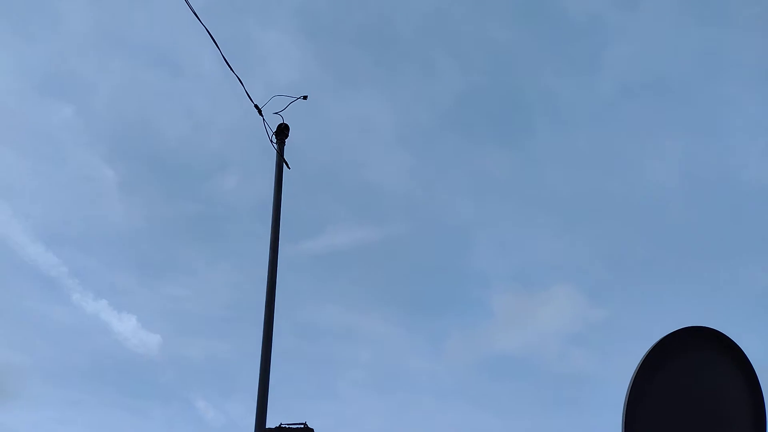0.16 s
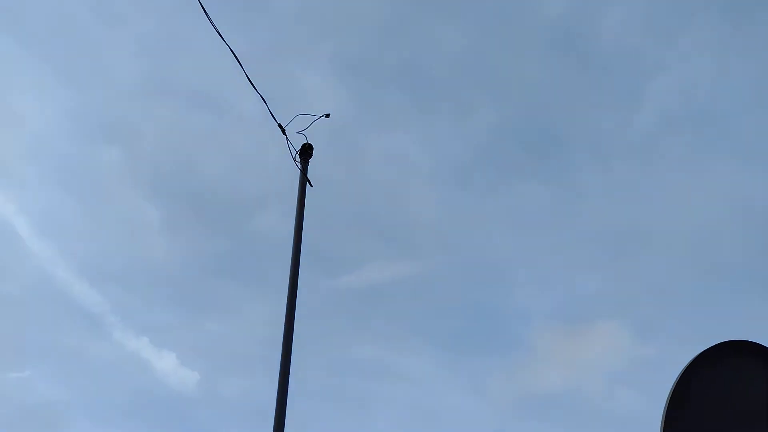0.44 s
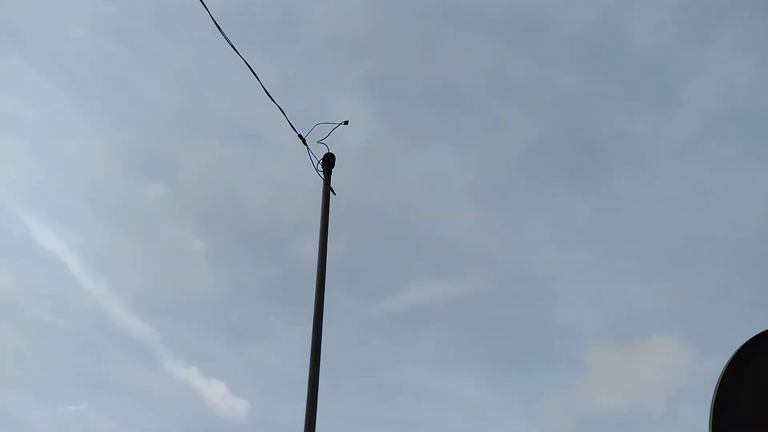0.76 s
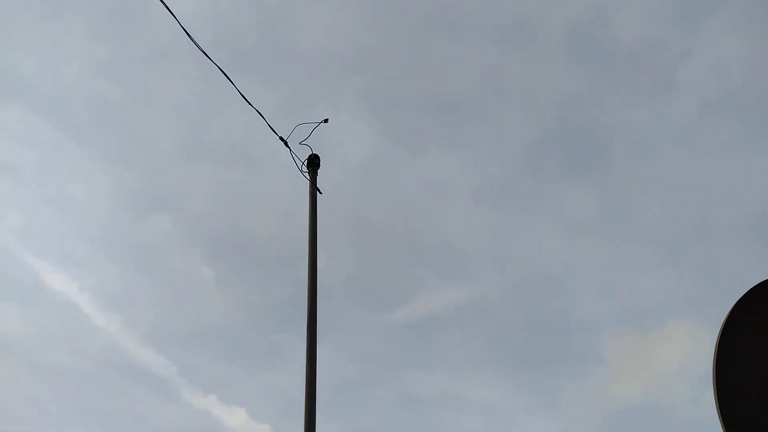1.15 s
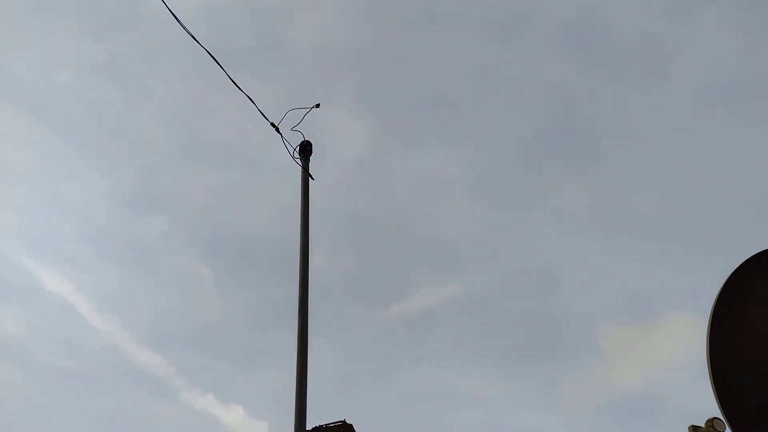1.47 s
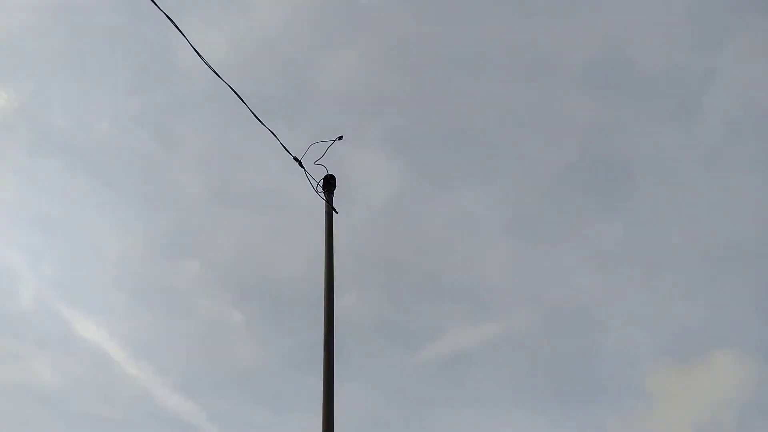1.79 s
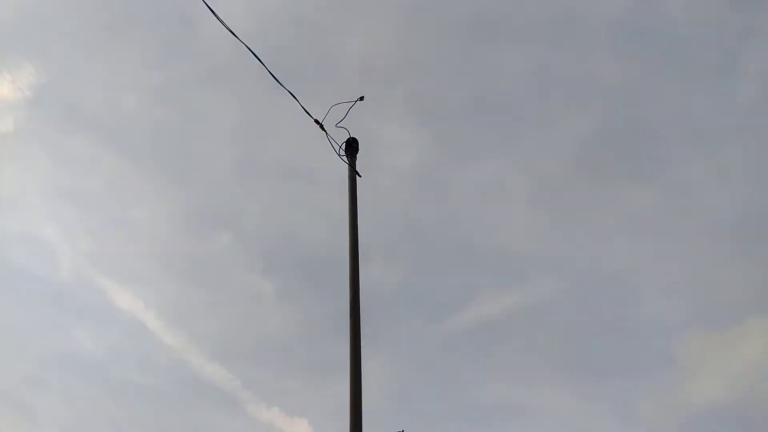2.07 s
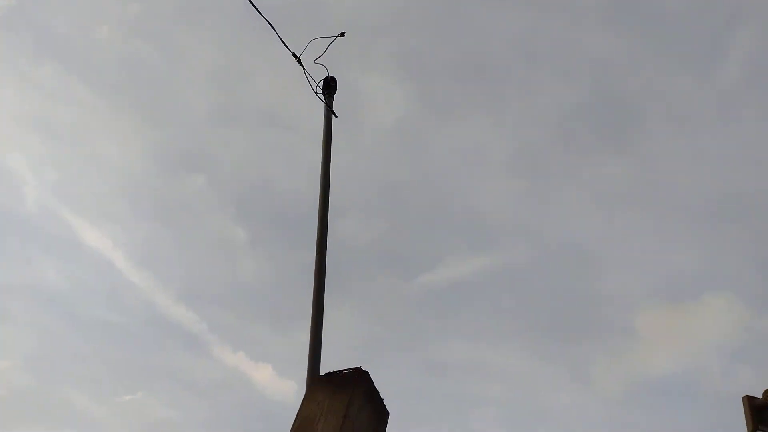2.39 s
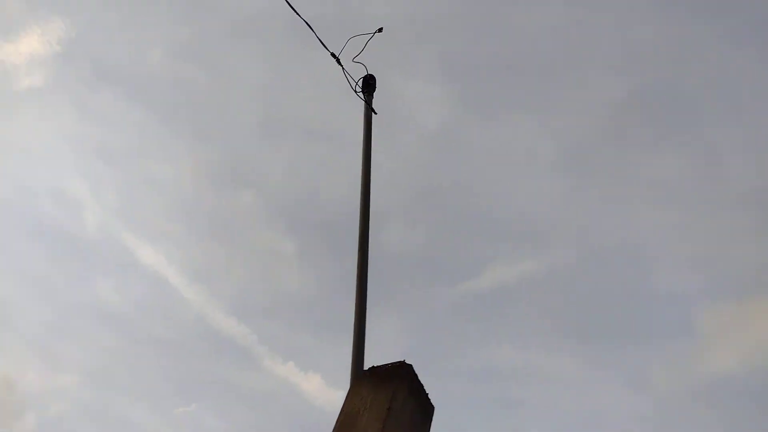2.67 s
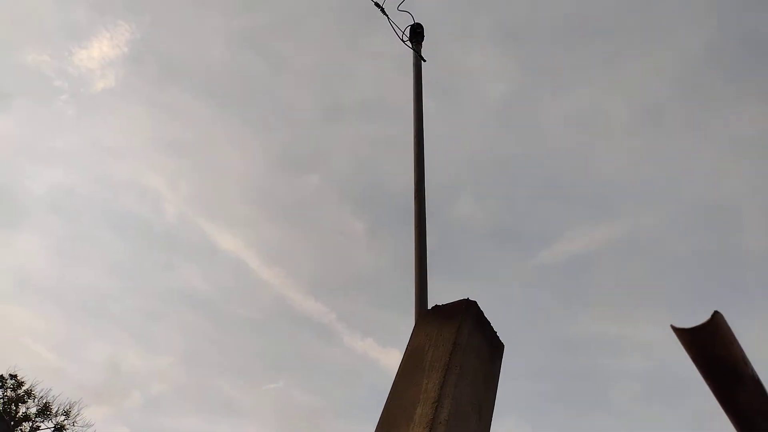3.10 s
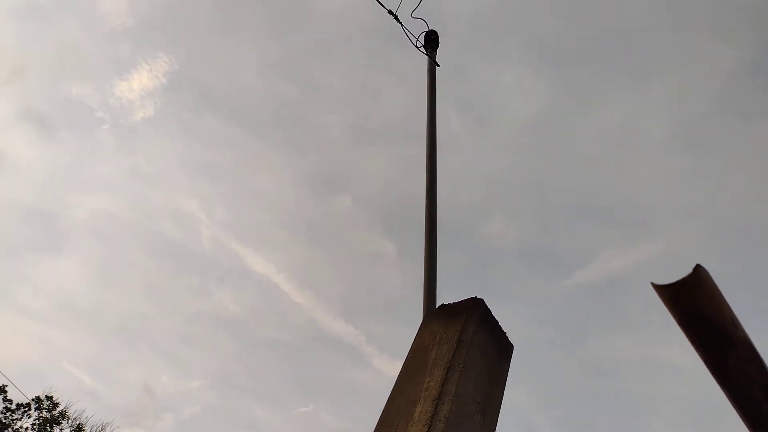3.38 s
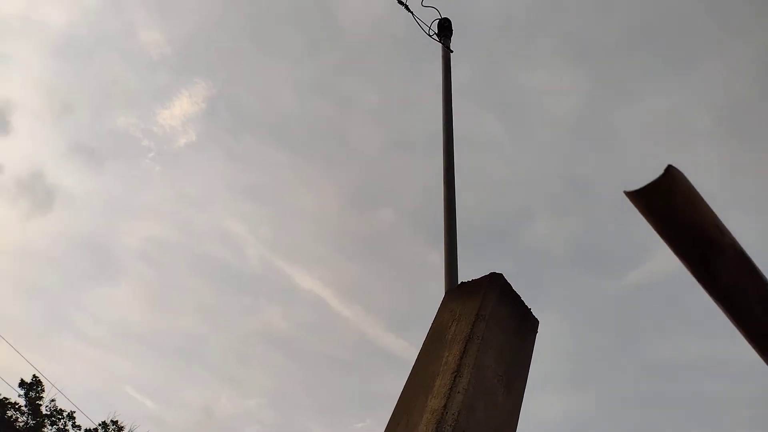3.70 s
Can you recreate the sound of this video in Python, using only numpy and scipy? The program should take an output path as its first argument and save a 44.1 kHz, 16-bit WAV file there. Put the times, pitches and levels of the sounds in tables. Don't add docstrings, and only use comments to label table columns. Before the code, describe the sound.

Raucous birds duet in quick rhythmic bursts, a low raspy caller overlapping a shrill sliding one, with faint dove coos, dry crackles and steady soft air noise, heard at a distance on a phone outdoors.

```python
import sys
import numpy as np
from scipy import signal
from scipy.fft import rfft, irfft, next_fast_len
from scipy.io import wavfile
from scipy.ndimage import uniform_filter1d

SR = 44100
rng = np.random.default_rng(int(sys.argv[2]) if len(sys.argv) > 2 else 0)


def linear_from_db(decibels):
    return 10 ** (np.asarray(decibels, float) / 20)


def to_wav(s):
    ch = np.atleast_2d(s).T
    pcm = np.round(np.clip(ch, -1, 1) * 32767)
    wavfile.write(sys.argv[1], SR, pcm.astype(np.int16))


N = 169785


def evened(x):
    return x / np.sqrt(np.mean(x ** 2) + 1e-20)


def read(points, hz, col=1):
    table = np.transpose(points)
    return np.interp(np.log(hz + 1), np.log(table[0] + 1), table[col])


def coloured(x, points):
    gain = linear_from_db(read(points, np.fft.rfftfreq(x.shape[-1], 1 / SR)))
    return irfft(rfft(x) * gain, x.shape[-1])


def add(mix, start_s, sound):
    part = mix[round(start_s * SR):][:len(sound)]
    part += sound[:len(part)]


def resonate(x, hz, width_hz):
    turn = np.exp(2j * np.pi * np.cumsum(hz * np.ones(len(x))) / SR)
    r = np.exp(-np.pi * width_hz / SR)
    return 2 * (turn * signal.lfilter([1 - r], [1, -r], x / turn + 1e-18)).real


def drift(noise, size):
    return evened(uniform_filter1d(uniform_filter1d(noise, size), size))


AIR_DB = -43
HUM_HZ, HUM_WIDTH_HZ, HUM_DB, HUM_ENDS_S = 176, 2.7, -55, 0.91
# hz, level_db_per_hz
AIR_SPECTRUM = [(25, -3.5), (100, 8), (250, 1), (700, -11), (1500, -12.5), (4000, -25.5), (10000, -16.5),
                (15000, -35.5)]


def air():
    noise, t = rng.standard_normal((3, N)), np.arange(N) / SR
    wash = evened(coloured(noise[0], AIR_SPECTRUM)) * linear_from_db(0.27 * drift(noise[1], size=4000))
    fade = np.clip((HUM_ENDS_S - t) / 0.2, 0, 1)
    hum = evened(resonate(noise[2], HUM_HZ, HUM_WIDTH_HZ)) * fade
    return linear_from_db(AIR_DB) * wash + linear_from_db(HUM_DB) * hum


ECHO_DB = -11.5
# hz, t60_s
TREE_DECAY = [(500, 0.41), (1200, 0.77), (4000, 1), (10000, 0.2)]


def trees(x):
    taps = np.zeros((2, SR))
    at = np.arange(800, SR - 20, 20) + rng.integers(0, 20, (2, (SR - 801) // 20))
    np.put_along_axis(taps, at, rng.choice([-1., 1.], at.shape), 1)
    hz, t, z = signal.stft(taps, SR, nperseg=256)
    decay = linear_from_db(-60 * t / read(TREE_DECAY, hz)[:, None])
    tail = signal.istft(z * decay, SR, nperseg=256)[1]
    return signal.fftconvolve(x[None], tail / np.linalg.norm(tail[0]), axes=1)[:, :N]


SNAPS_PER_S, SNAP_LOW_HZ, SNAP_HIGH_HZ = 3500, 3240, 12000
# start_s, level_db, length_s (time to fall 20 dB)
CRACKLE_EVENTS = [(0.892, -33.5, 0.015), (0.907, -43, .008), (0.912, -35.5, 0.037), (1.413, -40.5, 0.092),
                  (1.783, -38.5, 0.12), (2.488, -36.5, 0.013), (2.499, -31.5, 0.032), (3.312, -49, .04),
                  (.68, -48, 0.12), (.805, -47, .03), (1.63, -48, 0.077), (2.8, -40.5, 0.098)]


def crackle(start_s, level_db, length_s):
    chance, t = rng.random((2, 4000)), np.arange(4000) / SR
    snaps = (chance[0] < SNAPS_PER_S / SR) * (chance[1] - 0.5) * linear_from_db(-20 * t / length_s)
    snaps[0] = 0.5
    band = signal.butter(2, [SNAP_LOW_HZ, SNAP_HIGH_HZ], "bandpass", fs=SR, output="sos")
    return start_s, linear_from_db(level_db + 26) * signal.sosfilt(band, snaps)


COO_SAG, COO_PEAK = 0.072, 0.276
# start_s, length_s, level_db, top_hz
COO_EVENTS = [
    (1.74, .175, -43, 890),
    (3.56, .195, -45, 890),
]


def coo(start_s, length_s, level_db, top_hz):
    u = np.arange(0, length_s, 1 / SR) / length_s
    hz = top_hz * (1 - COO_SAG * ((u - COO_PEAK) / (1 - COO_PEAK)) ** 2)
    tone = np.sin(2 * np.pi * np.cumsum(hz) / SR)
    return start_s, linear_from_db(level_db) * np.sqrt(np.sin(np.pi * u)) * tone


FALL_DB, EDGE_S = -3, 0.016


def effort(length_s, peak, rise_db):
    u, peak = np.arange(0, length_s, 1 / SR) / length_s, np.clip(peak, 0.05, 0.95)
    rise = rise_db * (1 - u / peak)
    fall = FALL_DB * (u - peak) / (1 - peak)
    edges = np.clip(np.minimum(u, 1 - u) * length_s / EDGE_S, 0, 1)
    return u, linear_from_db(np.where(u < peak, rise, fall)) * edges


THROB_PER_S, THROB_JITTER, THROB_SPREAD_DB, THROB_SHARP = 68, 0.35, 3, 0.8


def throb(chance):
    turns = np.cumsum(THROB_PER_S * np.exp(THROB_JITTER * drift(chance[0], size=400))) / SR
    sizes = linear_from_db(THROB_SPREAD_DB * np.clip(chance[1, turns.astype(int)], -2, 1.5))
    return evened(sizes * abs(np.sin(np.pi * turns)) ** THROB_SHARP)


STRANDS, STRAND_SPREAD_DB = 0.65, 3.5
# hz, level_db_per_hz
RASP_SPECTRUM = [(700, 3), (1500, -11.5), (2500, 5), (4200, -3.5), (5500, -6), (8500, -16), (11500, -13),
                 (14000, -55)]


def rasp(noise, gate, turns, level_db):
    sizes = linear_from_db(STRAND_SPREAD_DB * noise[:40])
    strands = sum(size * np.cos(2 * np.pi * (k + 6) * turns + k * k) for k, size in enumerate(sizes))
    source = (1 - STRANDS) * noise + STRANDS * evened(strands)
    return linear_from_db(level_db) * evened(coloured(source, RASP_SPECTRUM) * (2 + gate))


HIGH_RISE_DB, HIGH_PEAK, HIGH_SAG = -9, 0.6, 0.1
HIGH_ROUGH, HIGH_WANDER, HIGH_THROB, HIGH_RASP_DB = 0.18, 0.022, 0.45, -8
HALF_DB = -8
SECOND_HZ, SECOND_DEPTH, SECOND_WANDER = 250, 0.5, 0.12
# hz, gain_db
HIGH_THROAT_GAIN = [(800, 3.5), (1500, 13), (2250, 6.5), (3000, -3), (4000, 5.5), (6100, -2), (8600, -3),
                    (12000, -4.5)]
# start_s, length_s, effort_db, start_hz, top_hz
HIGH_EVENTS = [
    (0.685, 0.074, -39, 1982, 2000),
    (0.853, .095, -41, 1932, 1990),
    (1.658, .2, -37, 1049, 1759),
    (1.896, 0.12, -35.5, 1140, 1742),
    (2.023, 0.1, -33, 1683, 1888),
    (2.382, 0.082, -32, 1359, 1472),
    (2.643, .17, -37.5, 823, 1758),
    (2.85, 0.13, -34, 973, 2003),
    (2.978, 0.14, -30.5, 1348, 1650),
]


def high_call(start_s, length_s, effort_db, start_hz, top_hz):
    chance = rng.standard_normal((6, SR // 3))
    u, swell = effort(length_s, HIGH_PEAK, HIGH_RISE_DB)
    chance = chance[:, :len(u)]
    gate = 1 - HIGH_THROB + HIGH_THROB * throb(chance)
    climb = np.sin(np.pi / 2 * np.minimum(u / HIGH_PEAK, 1)) ** 1.3
    sag_hz = HIGH_SAG * top_hz * np.maximum(u - HIGH_PEAK, 0)
    hz = start_hz + (top_hz - start_hz) * climb - sag_hz
    turns = np.cumsum(hz * (1 + HIGH_WANDER * drift(chance[2], size=150))) / SR
    second = np.cumsum(SECOND_HZ * (1 + SECOND_WANDER * drift(chance[5], size=300))) / SR
    folds = sum(np.cos(np.pi * k * turns + k * k) * linear_from_db(HALF_DB * (k % 2)) for k in range(1, 14))
    folds = folds * (1 + SECOND_DEPTH * 2 * np.cos(2 * np.pi * second))
    drive = gate * ((1 - HIGH_ROUGH) * evened(folds) + HIGH_ROUGH * chance[3])
    voice = linear_from_db(effort_db) * evened(coloured(drive, HIGH_THROAT_GAIN))
    hiss = rasp(chance[4], gate, turns / 6, effort_db + HIGH_RASP_DB)
    return start_s, swell * (voice + hiss)


LOW_RISE_DB, LOW_ROUGH, LOW_WANDER, LOW_ARCH = -7, 0.13, 0.025, 0.24
LOW_RASP_DB, RASP_FOLLOWS = -41, 0.37
LOW_SECOND_HZ, LOW_SECOND_DEPTH = 170, 0.45
LOW_RING_WIDTH_HZ = 340
CHEST_HZ, CHEST_WIDTH_HZ, CHEST_DB = 538, 117, -16
# start_s, length_s, effort_db, ring_hz, peak_place (0-1)
LOW_EVENTS = [(0.148, .12, -40.5, 1200, 1), (.33, 0.099, -32, 1161, 0.97), (0.507, 0.21, -35, 1190, 0.69),
              (0.771, 0.12, -47, 1200, 0.36), (0.939, .135, -30, 1294, 0.62),
              (1.151, 0.11, -27.5, 1200, 0.43), (1.311, .228, -28.5, 1261, .36),
              (1.932, .125, -30, 1326, 0.66), (2.116, .13, -30, 1200, 0.26),
              (2.298, .12, -29.5, 1261, 0.42), (2.451, 0.054, -33, 1172, 0.1),
              (3.125, 0.12, -34.5, 1314, 0.22), (3.296, 0.12, -31.5, 1249, 0.44),
              (3.49, 0.2, -33.5, 1265, 0.29)]


def low_call(start_s, length_s, effort_db, ring_hz, peak):
    chance = rng.standard_normal((6, SR // 3))
    u, swell = effort(length_s, peak, LOW_RISE_DB)
    chance = chance[:, :len(u)]
    gate = throb(chance)
    hz = ring_hz * (1.03 - LOW_ARCH * (np.exp(-u / 0.15) + 0.5 * u ** 3))
    turns = np.cumsum(hz / 2 * (1 + LOW_WANDER * drift(chance[2], size=200))) / SR
    second = np.cumsum(LOW_SECOND_HZ * (1 + 2 * SECOND_WANDER * drift(chance[5], size=300))) / SR
    sidebands = 1 + LOW_SECOND_DEPTH * 2 * np.cos(2 * np.pi * second)
    folds = np.cos(2 * np.pi * turns) + np.cos(4 * np.pi * turns) * sidebands
    drive = gate * ((1 - LOW_ROUGH) * evened(folds) + LOW_ROUGH * 3 * chance[3])
    ring = resonate(drive, hz, LOW_RING_WIDTH_HZ)
    ring = evened(resonate(ring, hz, LOW_RING_WIDTH_HZ))
    chest = resonate(drive, CHEST_HZ, CHEST_WIDTH_HZ)
    chest = evened(resonate(chest, CHEST_HZ, CHEST_WIDTH_HZ))
    hiss = rasp(chance[4], gate, turns / 2, LOW_RASP_DB + RASP_FOLLOWS * (effort_db + 42))
    return start_s, swell * (linear_from_db(effort_db) * (ring + linear_from_db(CHEST_DB) * chest) + hiss)


APART_DB = -24.5


def scene():
    direct = np.zeros(N)
    voices = ((low_call, LOW_EVENTS), (high_call, HIGH_EVENTS), (coo, COO_EVENTS), (crackle, CRACKLE_EVENTS))
    for voice, events in voices:
        for event in events:
            add(direct, *voice(*event))
    echo, wash = trees(direct), air()
    apart = linear_from_db(APART_DB) * (echo[1] + 0.17 * np.roll(wash, N // 2))
    return direct + linear_from_db(ECHO_DB) * echo[0] + wash + np.array([apart, -apart])


def low_pass(x):
    return signal.sosfilt(signal.butter(12, 15780, fs=SR, output="sos"), x)


PORT_DELAY_S, ARRIVAL_LEAD_S = 18 / SR, 0.87 / SR
TWIN_LEFT, TWIN_RIGHT = 0.87, 1
TWIN_FULL_HZ = 1200
HISS_DB, HISS_FROM_HZ, EDGE_HZ = -60, 9000, 15780
# hz, gain_db, lead_rad
PORT_BALANCE = [(100, -2.5, .01), (750, -2.4, .05), (1200, -1.6, .3), (1700, 1.5, .5), (2400, -.3, .01),
                (9000, -1.5, .01)]


def record(dry):
    size = next_fast_len(N + 4096)
    hz = np.fft.rfftfreq(size, 1 / SR)
    a, b = rfft(dry, size)
    b = b * np.exp(2j * np.pi * hz * ARRIVAL_LEAD_S)
    late = np.exp(-2j * np.pi * hz * PORT_DELAY_S)
    balance = linear_from_db(read(PORT_BALANCE, hz)) * np.exp(1j * read(PORT_BALANCE, hz, col=2))
    treble = hz / (hz + TWIN_FULL_HZ)
    left = 1 - (1 - TWIN_LEFT) * treble
    right = 1 - (1 - TWIN_RIGHT) * treble
    sides = np.array([balance * (a - left * late * b), b - right * late * a])
    hiss = rfft(rng.standard_normal((2, size))) * hz / (hz + HISS_FROM_HZ)
    sides = sides + linear_from_db(HISS_DB) * hiss
    mix = irfft(sides * (hz < EDGE_HZ), size)[:, :N] / 2
    return low_pass(mix)


dry = scene()
out = record(dry)
to_wav(out)
```